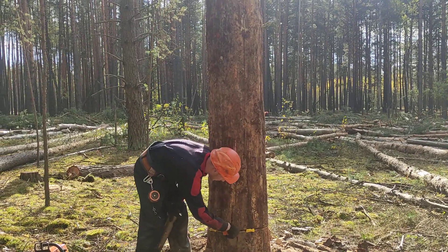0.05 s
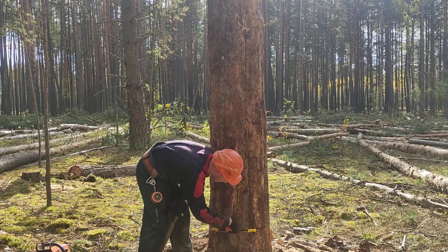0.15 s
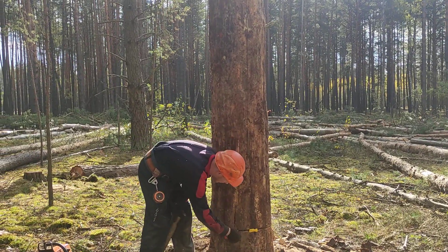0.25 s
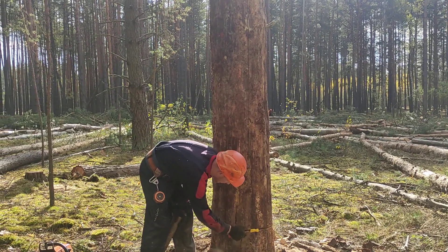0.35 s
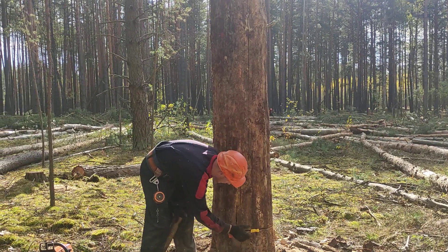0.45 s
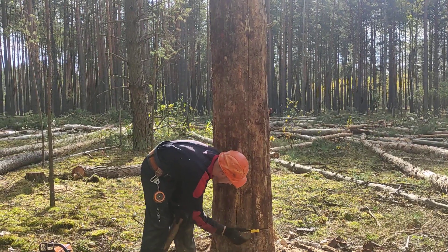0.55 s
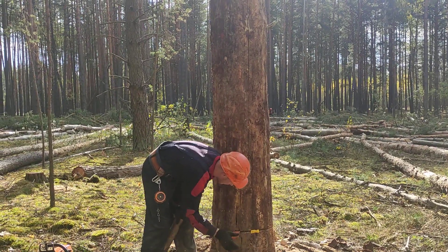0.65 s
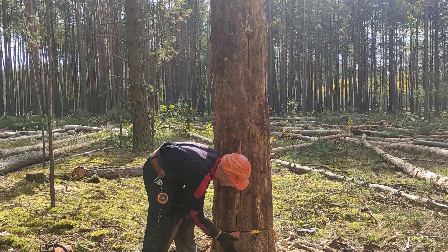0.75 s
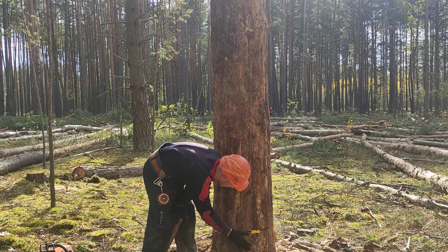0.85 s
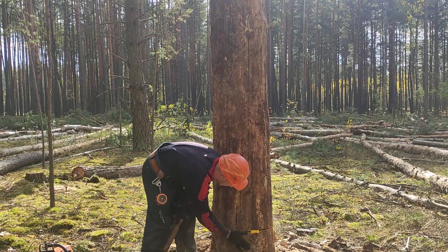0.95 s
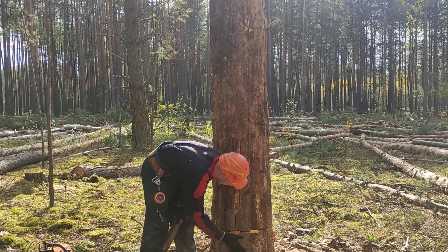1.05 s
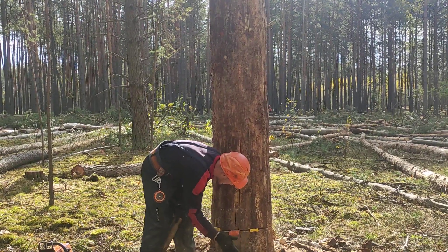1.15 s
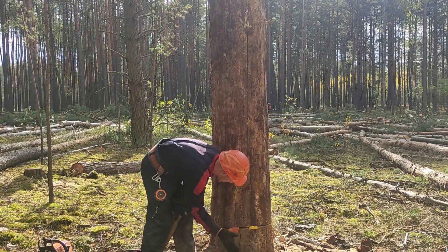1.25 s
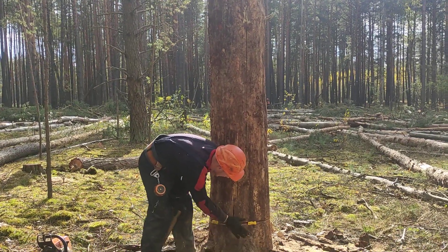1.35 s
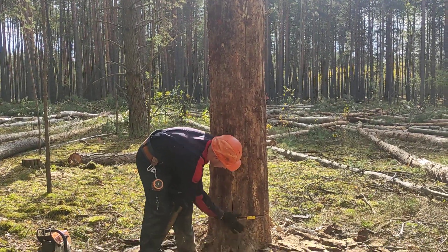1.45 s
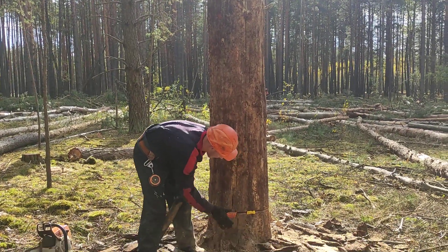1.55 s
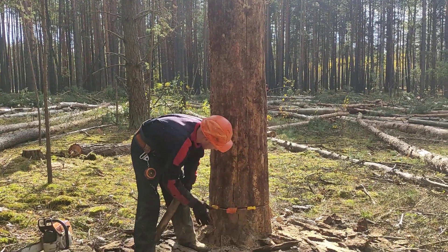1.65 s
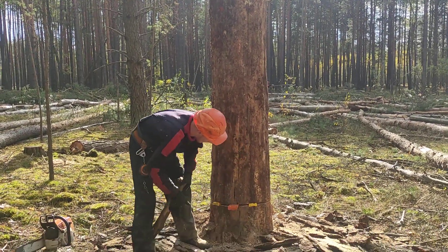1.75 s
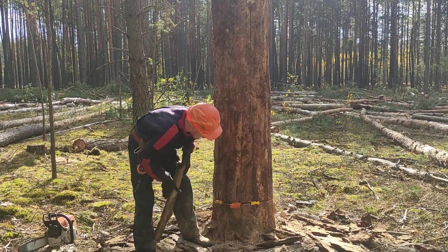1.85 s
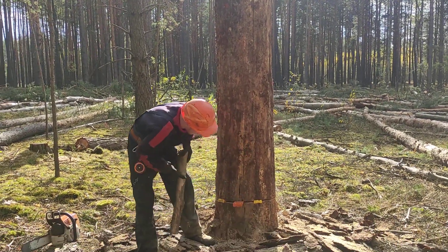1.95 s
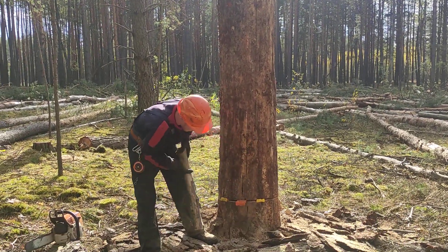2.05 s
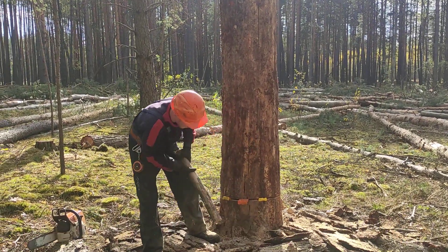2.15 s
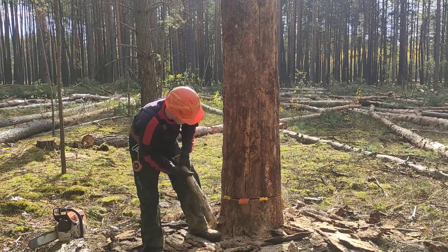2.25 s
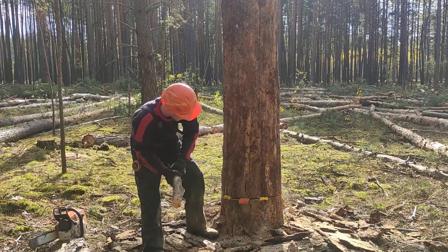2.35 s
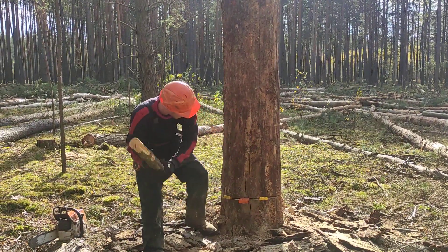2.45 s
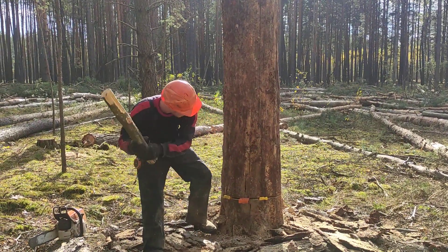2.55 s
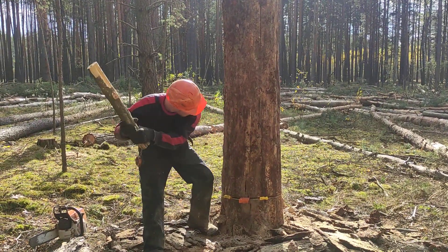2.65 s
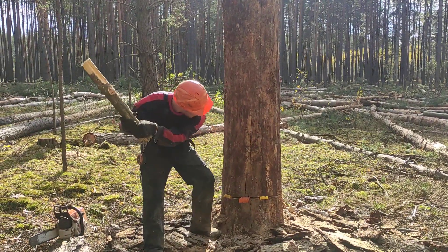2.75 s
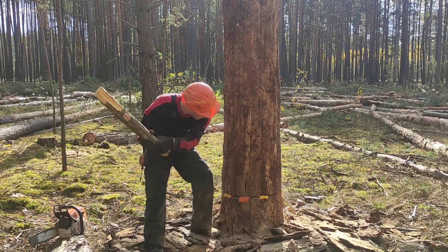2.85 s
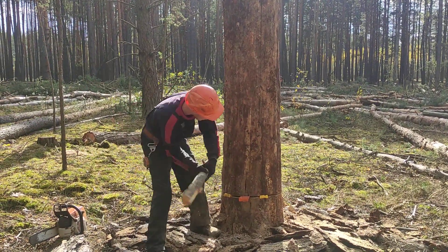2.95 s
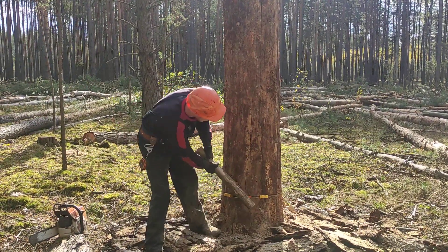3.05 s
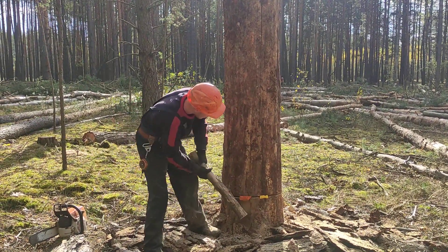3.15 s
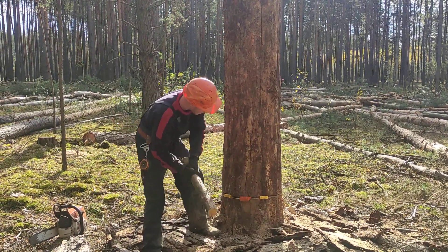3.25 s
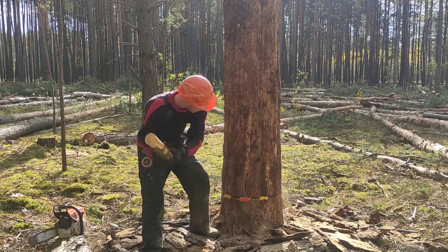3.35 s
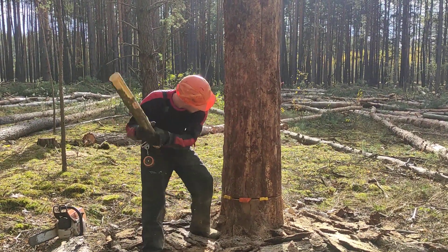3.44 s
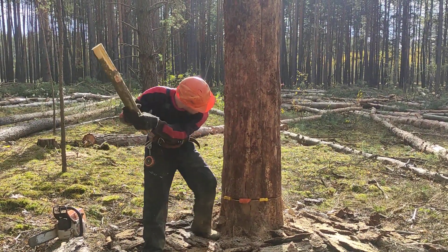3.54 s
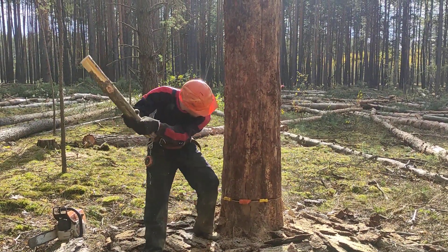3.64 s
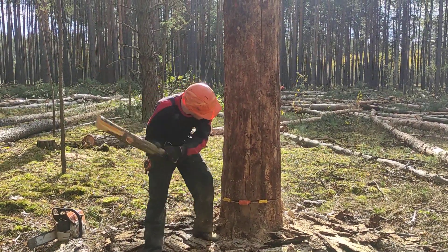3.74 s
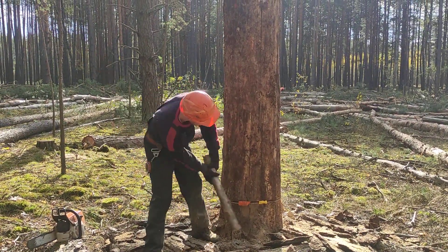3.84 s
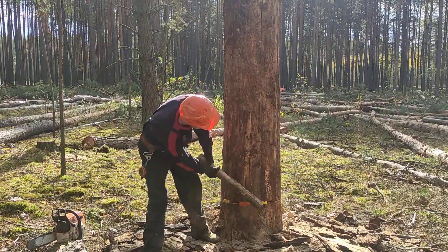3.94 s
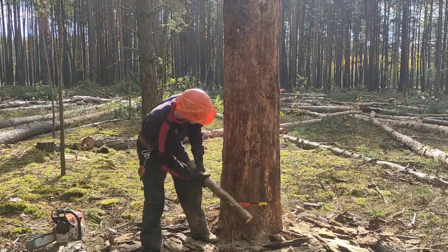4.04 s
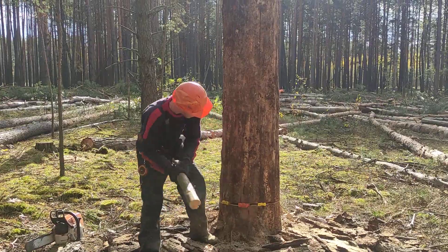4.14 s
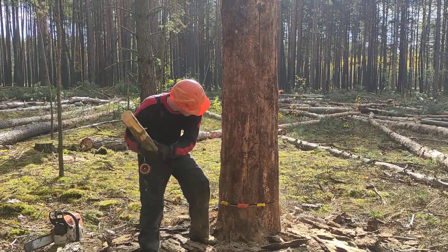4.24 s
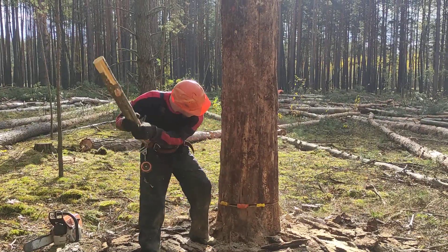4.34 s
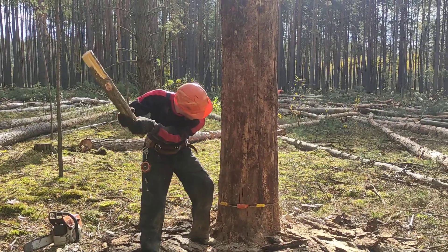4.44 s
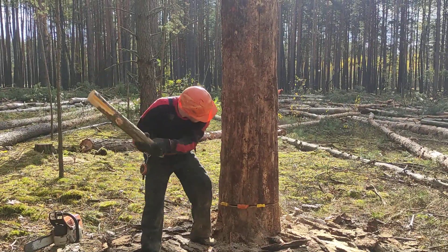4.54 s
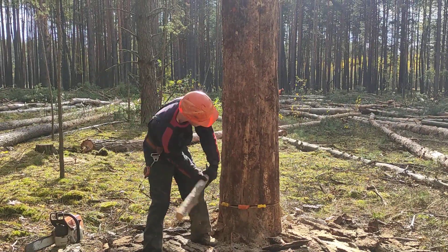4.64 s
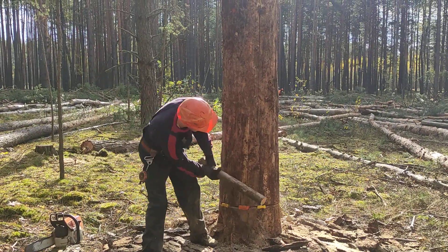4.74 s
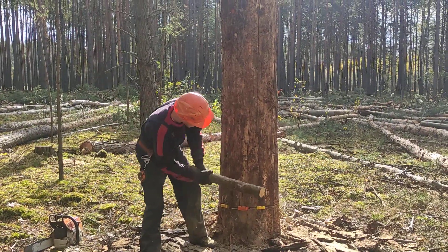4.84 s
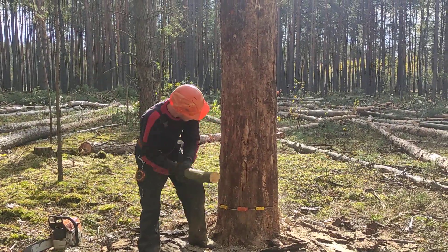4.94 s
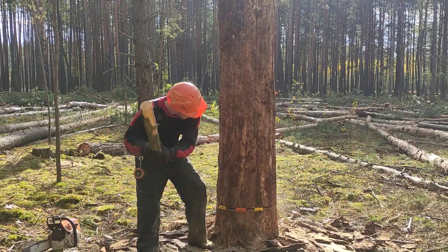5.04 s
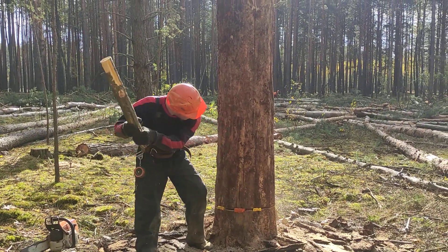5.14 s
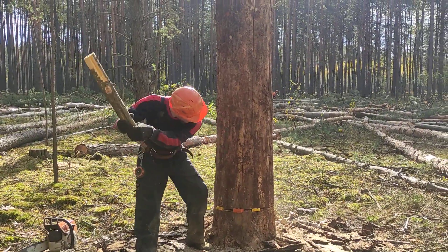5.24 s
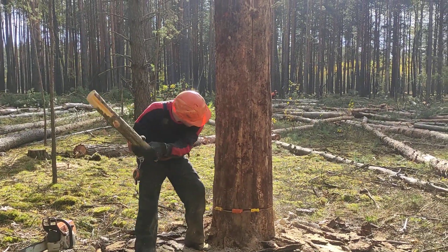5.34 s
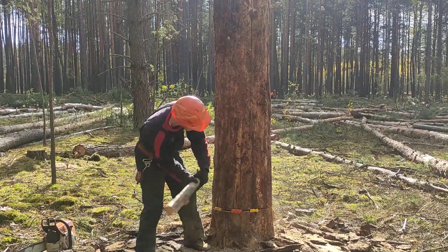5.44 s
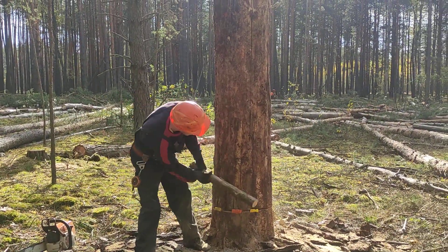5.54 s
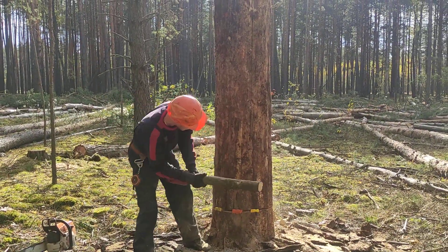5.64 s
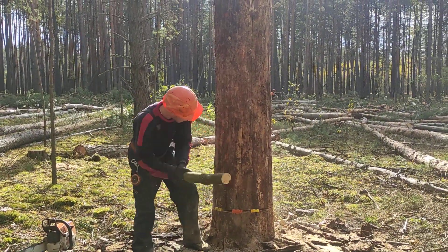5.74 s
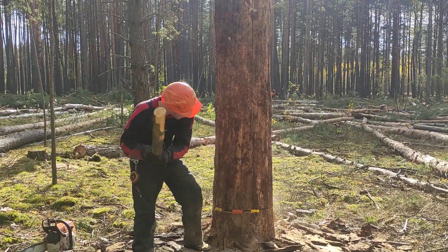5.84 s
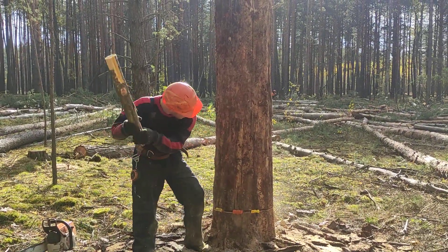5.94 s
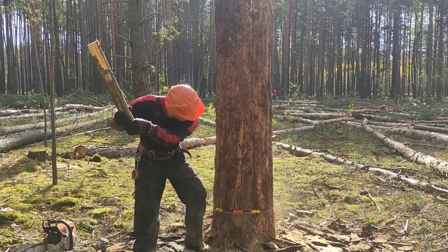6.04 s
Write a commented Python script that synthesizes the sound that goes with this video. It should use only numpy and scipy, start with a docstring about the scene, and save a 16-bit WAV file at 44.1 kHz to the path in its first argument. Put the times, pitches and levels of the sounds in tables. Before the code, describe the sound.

A still forest clearing with a very faint hush of wind in the crowns and slight low buffeting. In the first half second, soft boot bumps on moss, small twig ticks and a brief cloth brush. At 0.93 s a tight cluster of light wooden taps, then a firmer knock at 1.43 s. From 1.5 to 3 s feet shift: dull bumps, crackling dry litter, snapping bark and twigs, heavy cloth swishing. Four hard club blows on a wedge land at about 3.14, 3.99, 4.82 and 5.62 s, the first with a small rebound knock. Each is a very short, dry, woody crack with crushed fibres, a low boom sinking in the trunk, stronger on the last two, and a diffuse echo from the tree line swelling about 0.3 s later. Sparse rustles and ticks fall between; cloth brushes near 5.95 s, with a last boot bump at 6 s as the echo lingers.

```python
"""Driving a felling wedge

A forester seats a felling wedge in a pine with light knocks, steps back and drives it with four swings of a
wooden club. Each blow is a crack of damped wood modes and fibre noise, with a sinking boom of many sines in the
trunk and an echo of sparse filtered impulses from the trunks nearby and, later, from the forest edge across the
clearing. Between blows, boots bump on moss as sinking sines; filtered noise and grains make dry litter, bark,
twigs, brushing clothes and a faint wind in the crowns."""
import sys
import numpy as np
from scipy import signal
from scipy.fft import rfft, irfft, next_fast_len
from scipy.io import wavfile

SR = 44100
rng = np.random.default_rng(int(sys.argv[2]) if len(sys.argv) > 2 else 0)


def to_wav(sig):
    """Store sig (one row per channel, or 1-D mono) as 16-bit WAV at the path in sys.argv[1].

    Samples outside -1..1 are clipped; the rate is SR.
    """
    pcm = np.clip(np.atleast_2d(sig), -1, 1) * 32767
    pcm = np.round(pcm).astype(np.int16)
    wavfile.write(sys.argv[1], SR, pcm.T)  # frames by channels


N = 268569


def amp(db):
    """Decibels to gain."""
    return 10 ** (np.asarray(db) / 20)


def unit(x):
    """Scales to rms 1."""
    return x / np.sqrt(np.mean(x ** 2) + 1e-20)


def burst_energy(x):
    """Scales a short sound to the energy of 10 ms at rms 1."""
    return x * np.sqrt(SR / 100 / np.sum(x ** 2))


def seconds(length):
    """A time axis of the given length in seconds."""
    return np.arange(int(length * SR)) / SR


def decay(t, t60):
    """Exponential decay that falls 60 dB in t60 seconds."""
    return np.exp(-np.log(1000) * t / t60)


def add(mix, s, sound):
    """Mixes a sound in at time s, cut off at the end of the mix."""
    part = mix[max(round(s * SR), 0):][:len(sound)]
    part += sound[:len(part)]


def colour(x, points):
    """Causal minimum-phase filter with the given (frequency [Hz], level [dB]) outline."""
    size = 2 * next_fast_len(len(x))
    hz, db = np.transpose(points)
    bins_hz = np.fft.rfftfreq(size, 1 / SR)
    outline_db = np.interp(np.log(bins_hz + 1), np.log(hz), db)
    # folding the cepstrum onto positive time gives the phase that belongs to the outline
    cepstrum = irfft(np.log(amp(outline_db)))
    cepstrum[1:size // 2] *= 2
    cepstrum[size // 2 + 1:] = 0
    response = np.exp(rfft(cepstrum))
    return irfft(rfft(x, size) * response)[:len(x)]


def drift(size, rate):
    """Slow chance of rms 1, moving up to about rate times a second."""
    lowpass = 1 / (1 + (np.fft.rfftfreq(size, 1 / SR) / rate) ** 4)
    return unit(irfft(rfft(rng.standard_normal(size)) * lowpass, size))


def burst(t, t60, points, rise):
    """A swelling, then dying shower of fibre breaks: coloured noise of fixed energy."""
    breaks = rng.choice([-1, 1], len(t))
    swell = 1 - np.exp(-t / rise)
    return burst_energy(colour(breaks * swell * decay(t, t60), points))


# spectrum of the wind in the crowns: (frequency [Hz], level [dB])
WIND_COLOUR = [(15, -42), (25, -30), (64, 4), (135, -17.5), (185, -8), (339, -4), (373, -8.5), (635, -8),
               (733, -9), (1110, -16.5), (1340, -23), (2120, -24), (4480, -45), (6600, -31), (8000, -43.5),
               (10400, -78.5), (17600, -120)]


def wind(level_db=-57, swell_db=-1.0, buffet_db=-67, gust_db=3):
    """A steady hush in the crowns, and uneven low buffeting at the microphone."""
    hush = unit(colour(rng.standard_normal(N), WIND_COLOUR))
    hush *= amp(level_db + swell_db * drift(N, 1.0))
    buffet_colour = [(20, -12.0), (70, -3.5), (130, 8.0), (300, -18.0), (1000, -75.5)]
    buffet = unit(colour(rng.standard_normal(N), buffet_colour))
    return hush + buffet * amp(buffet_db + gust_db * drift(N, 3.5))


# feet stirring the dry litter: (time at full level [s], hold [s], level [dB])
SHUFFLES = [(0.0, 0.1, -70), (1.416, 0.2, -62.5), (1.766, 0.15, -59.5), (2.43, 0.29, -70.5),
            (2.714, 0.31, -65), (3.107, 0.21, -66.5), (3.96, 0.23, -66.5), (4.71, 0.14, -71)]
SHUFFLE_ATTACK_S, SHUFFLE_RELEASE_S = 0.075, 0.086
# the litter is almost still while he crouches, and never quite at rest once he is up
STANDS_UP_S, CROUCHED_DB, STANDING_DB = 1.7, -90.5, -74.5


def stirring():
    """How hard the feet work the litter: each shuffle starts quickly, holds and dies away."""
    t = np.arange(N) / SR
    power = amp(np.where(t < STANDS_UP_S, CROUCHED_DB, STANDING_DB)) ** 2
    for s, hold, db in SHUFFLES:
        attack = np.clip(1 + (t - s) / SHUFFLE_ATTACK_S, 0, 1)
        release = np.exp(-np.maximum(t - s - hold, 0) / SHUFFLE_RELEASE_S)
        power += (amp(db) * attack * release) ** 2
    return np.sqrt(power)


# spectrum of the dry litter: (frequency [Hz], level [dB])
LITTER_COLOUR = [(100, -47), (400, 6.5), (800, -12.5), (1300, -0.5), (2200, -6.5), (3400, -8), (4100, -25),
                 (5400, -14.5), (6200, -3.5), (7400, -3.5), (9000, -62)]


def rustle(grains_per_s=700, clump_db=3, clump_rate=30):
    """Dry litter crackles in clumps of tiny grains, a few of them much larger, as the feet shift."""
    sizes = amp(4.6 * np.minimum(rng.exponential(1, N), 3))
    sizes *= rng.random(N) < grains_per_s / SR
    grains = unit(colour(sizes * rng.choice([-1, 1], N), LITTER_COLOUR))
    return grains * stirring() * amp(clump_db * drift(N, clump_rate))


# spectrum of snapping bark and twigs, for chips and twigs alike: (frequency [Hz], level [dB])
SNAP_COLOUR = [(150, -27), (600, 4.5), (1200, -3.5), (2200, -1), (3300, -17.5), (4300, -17), (5400, -10.5),
               (6500, 1), (7500, -5.5), (9000, -18)]


def chips(level_db=9, spread_db=2, per_s=4, t60=0.014, rise=0.00025, busy_db=-68):
    """Now and then a small chip of bark ticks by itself, louder as the feet get busier, up to a limit."""
    breaks = (rng.random(N) < per_s / SR) * amp(spread_db * rng.standard_normal(N))
    breaks = breaks * np.minimum(stirring(), amp(busy_db))
    tick = burst(seconds(.06), t60, SNAP_COLOUR, rise)  # one fibre shower serves all chips
    return signal.oaconvolve(breaks, tick)[:N] * amp(level_db)


# boots landing on moss and rocking until they settle:
# (time [s], level [dB], middle of the pitch glide [Hz], gap between bumps [s], loss per bump, sign ignored [dB])
STEPS = [(0.081, -41.5, 87, 0.05, -2), (0.353, -37.5, 83, 0.052, 2), (0.396, -28, 182, .058, 17),
         (0.411, -29.5, 124, 0.061, 20), (0.453, -30, 119, .055, 6.5), (1.195, -38, 84, .055, 20),
         (1.506, -35.5, 110, 0.11, 5), (1.573, -29, 95, .077, 8), (2.544, -41.5, 82, .055, 15),
         (2.781, -41, 233, .055, 32), (3.077, -31, 87, 0.043, 15), (3.367, -41.5, 82, 0.049, 1.2),
         (4.196, -39.5, 125, .055, 23), (5.178, -32.5, 98, 0.039, 9), (6.031, -35, 72.5, 0.048, 15)]


def bumps(swell=0.0056, sag=0.48, uneven=0.14, count=4):
    """Soft ground takes a push and swings back, slowing as it settles; the boot rocks and pushes ever more weakly."""
    out, t = np.zeros(N), seconds(.1)
    # after the landing, each rock of the boot meets firmer or softer ground
    after_landing = np.arange(count) > 0
    stiffness = 1 + uneven * rng.uniform(-1, 1, (len(STEPS), count)) * after_landing
    glide = 1 + sag * (2 * np.exp(-t / (2 * swell)) - 1)
    pulse = t / swell * np.exp(1 - t / swell)
    for (s, db, hz, gap, lost_db), ground in zip(STEPS, stiffness):
        turns = np.cumsum(hz * glide) / SR
        for k in range(count):
            push = pulse * np.sin(2 * np.pi * turns * ground[k])
            add(out, s + k * gap, amp(db - k * abs(lost_db)) * push)
    return out


# twigs and bark chips breaking: (time [s], level before the common trim [dB], woody body [dB])
TWIGS = [(0.169, -53, 7), (0.209, -46.5, 2), (0.311, -54.5, 8), (1.146, -54, -1), (1.388, -50.5, -9),
         (1.553, -38, 7), (1.879, -43, 1), (2.012, -44, 7.5), (2.302, -41, 9.5), (2.396, -36.5, -1),
         (2.460, -46.5, -4), (2.702, -57, -12), (2.818, -47, -8), (2.964, -50.5, 16), (2.982, -48, 9),
         (3.075, -50, 1), (3.357, -43, 9), (3.616, -45, -12), (4.465, -48.5, -7), (5.119, -46, 15.5),
         (5.238, -56.5, -12)]


def twigs(thin_t60=0.014, rise=0.00063, trim_db=-5):
    """Thin twigs only tick; thick ones and bark have a woody body and crunch for longer."""
    out, t = np.zeros(N), seconds(.06)
    for s, db, body_db in TWIGS:
        # the body counts in full up to 1200 Hz and not at all from 6000 Hz
        outline = [(hz, level + body_db * np.interp(hz, [1200, 6000], [1, 0])) for hz, level in SNAP_COLOUR]
        crunch = amp(.3 * body_db)
        add(out, s, amp(db + trim_db) * burst(t, thin_t60 * crunch, outline, rise))
    return out


# sleeves and trouser legs brushing: (middle [s], length [s], level before the fade in and out [dB])
SWISHES = [(0.218, 0.043, -49), (1.855, 0.32, -55.5), (2.125, 0.38, -59.5), (2.336, 0.14, -55.5),
           (2.62, 0.39, -55), (2.846, 0.23, -54), (5.954, 0.29, -53.5)]
# spectrum of the cloth: (frequency [Hz], level [dB])
CLOTH_COLOUR = [(100, -5.5), (300, 3.5), (550, -1), (850, -1.5), (1300, -12.5), (2200, -11), (4000, -33),
                (8000, -28.5)]


def clothes(grain_db=2, grain_rate=70):
    """Heavy cloth rubs in short, uneven strokes."""
    out = np.zeros(N)
    for s, length, db in SWISHES:
        size = len(seconds(length))
        rub = unit(colour(rng.standard_normal(size), CLOTH_COLOUR))
        rub *= amp(db + grain_db * drift(size, grain_rate))
        add(out, s - length / 2, rub * np.hanning(size))
    return out


# club, wedge and stem ringing together, before each blow's pitch and tilt:
# (frequency [Hz], level [dB], t60 [s])
WOOD_MODES = [(97, -9.5, 0.008), (329, -16, 0.027), (590, -16.5, 0.0099), (710, 2, 0.004),
              (671, -5.5, 0.025), (776, 6, 0.012), (973, 4, 0.016), (1425, -4, 0.01), (1572, -2, 0.012),
              (1930, -12.5, 0.022), (2200, -10, 0.012), (3040, -11, 0.005)]
# spectrum of the crushed fibres: (frequency [Hz], level [dB])
SPLINTER_COLOUR = [(300, -55.5), (900, 9.5), (2300, -2), (3400, -4.5), (4500, -15.5), (5500, -4),
                   (6300, -6.5), (7300, -7), (9000, -7)]


def knock(force_db, pitch, again_ms, again, thud_db, trunk_db, clack_db, bright_db, splinter_db,
          fibre_db=-26, fibre_t60=0.018, fibre_rise=0.0069, contact=0.001):
    """The club rings the wood's modes, crushes fibres, and catches the wedge once more as it gives."""
    t = seconds(.12)
    # where the club lands decides how strongly each group of modes is driven
    group_hz = [100, 300, 550, 700, 950, 1300, 1700, 2100]
    group_db = [thud_db, trunk_db, 0, 0, clack_db, bright_db, bright_db, splinter_db]
    ring = np.zeros(len(t))
    for hz, db, t60 in WOOD_MODES:
        drive = amp(db + np.interp(hz, group_hz, group_db))
        ring += drive * decay(t, t60) * np.sin(2 * np.pi * hz * pitch * t)
    ring *= 1 - np.exp(-t / contact)
    ring += again * np.interp(t - again_ms / 1000, t, ring, left=0)
    fibres = amp(fibre_db + splinter_db / 2) * burst(t, fibre_t60, SPLINTER_COLOUR, fibre_rise)
    return amp(force_db) * (ring + fibres)


# spectrum of the scatter close by: (frequency [Hz], level [dB])
NEAR_COLOUR = [(60, -6.5), (250, 13.5), (600, -0.5), (1100, 1), (2000, 1), (4000, 2), (8000, 2)]


def nearby(x, level_db=-22.0, t60=0.091, gap=0.0073):
    """Stumps, logs and ground close by scatter a short tail."""
    t = seconds(.3)
    opening = np.clip(t / gap - 1, 0, 1)  # silent for one gap, full after two
    taps = rng.standard_normal(len(t)) * decay(t, t60) * opening
    tail = colour(taps / np.linalg.norm(taps), NEAR_COLOUR)
    return amp(level_db) * signal.fftconvolve(x, tail)[:len(x)]


def boom(start_hz=300, sink=.3, rise=0.0093, spread=0.016, t60=2.3, wander=.48, top_hz=340):
    """Bending waves run up the stem and back; low ones travel slower, so the rumble sinks and thins out."""
    t = seconds(.7)
    hz = start_hz / (1 + t / sink)
    paths = rng.uniform(size=(40, 2))  # many paths through the stem, each with its own speed and phase
    speed = np.exp(wander * np.linspace(-1, 1, len(paths)) + .03 * paths[:, 0])
    turns = speed[:, None] * np.cumsum(hz) / SR + paths[:, 1:]
    waves = np.sin(2 * np.pi * turns).sum(0)
    level = (1 - np.exp(-(t / rise) ** 2)) / np.hypot(1, t / spread) * decay(t, t60)
    # the wood soaks up the waves above top_hz
    soak = signal.butter(8, top_hz, fs=SR, output="sos")
    return burst_energy(signal.sosfilt(soak, waves * level))


# spectrum of the forest's answer, before each blow's pitch and tint: (frequency [Hz], level [dB])
FAR_COLOUR = [(40, -4), (140, -2.5), (220, -12.5), (330, -3.5), (450, -4), (620, -3), (880, 1.5),
              (1250, -8.5), (1750, -3.5), (2200, -16.5), (3300, -26.5), (4200, -35.5), (7500, -44)]
# scattered trunks answer at once and fade; the wall of trees round the clearing answers later
SCATTER_RISE_S, SCATTER_FADE_DB_PER_S = .02, 9.5
TREELINE_DELAY_S, TREELINE_SPREAD_S, TREELINE_DB = 0.29, 0.087, -0.5
AVERAGE_CLACK_DB = -5  # a blow with this much clack leaves the middle of the forest's colour plain


def forest(pitch, clack_db, splinter_db, clack_share=0.49, treble_share=0.96, clump_db=0.37, clump_rate=25):
    """Thousands of trunks throw a blow back in its own colour: those close by at once, the edge of the clearing
    later."""
    t = seconds(1.5)
    trunks = rng.standard_normal(len(t)) * (rng.random(len(t)) < 6000 / SR)  # 6000 trunks a second
    middle_db = clack_share * (clack_db - AVERAGE_CLACK_DB)
    tint = [650, 900, 1750, 2200], [0, middle_db, middle_db, treble_share * splinter_db]
    outline = [(hz * pitch, db + np.interp(hz, *tint)) for hz, db in FAR_COLOUR]
    scatter = (1 - np.exp(-t / SCATTER_RISE_S)) * amp(-SCATTER_FADE_DB_PER_S * t)
    treeline = amp(TREELINE_DB) * np.exp(-((t - TREELINE_DELAY_S) / TREELINE_SPREAD_S) ** 2 / 2)
    clumps = amp(clump_db * drift(len(t), clump_rate))
    return unit(colour(trunks, outline)) * np.hypot(scatter, treeline) * clumps


# blows on the wedge: (time [s], force [dB], pitch [factor], share of second contact [0-1],
# grip of the wedge [dB], trunk [dB], clack [dB], splinter [dB], boom [dB])
BLOWS = [(0.9282, -23.5, 0.76, 0.27, -12, -20, -14, 11, -60),
         (0.9343, -21.5, 0.91, 0.04, -15, 1, -13, 18, -43),
         (0.9388, -17, 1.02, 0.54, -4.5, 7, -7.5, 5, -52),
         (1.431, -10.5, 0.95, 0.38, -3.5, 16.5, -2, 12, -37.5),
         (3.1381, 2.5, 0.92, 0.41, -5, -4, -11, 4.5, -31), (3.193, -24.5, 1.08, 0.37, 2, 13, -11, 11, -48),
         (3.9912, -0.5, 1.002, 0, 4.5, 1.5, -4, 4, -36), (4.8184, 2, 1.004, 0.01, 3, 9.5, -11, -5.5, -24),
         (5.624, 3.5, 0.91, 0.09, 4, 5.5, -13.5, -4.5, -22.5)]
SECOND_CONTACT_MS = 3.165
# a wedge that grips rings brighter and passes more of the blow into the stem:
# level at grip 0 [dB], and dB per dB of grip
THUD_DB, THUD_PER_GRIP = 7.5, 1.44
ECHO_DB, ECHO_PER_GRIP = -52.5, 0.96


def wedge():
    """All blows: the direct knocks, and what lingers in the stem and the forest."""
    direct, lingering = np.zeros(N), np.zeros(N)
    for s, force_db, pitch, again, grip_db, trunk_db, clack_db, splinter_db, boom_db in BLOWS:
        thud_db = THUD_DB + THUD_PER_GRIP * grip_db
        echo_db = force_db + ECHO_DB + ECHO_PER_GRIP * grip_db
        hit = knock(force_db, pitch, SECOND_CONTACT_MS, again, thud_db, trunk_db, clack_db,
                    bright_db=grip_db, splinter_db=splinter_db)
        add(direct, s, hit)
        add(lingering, s, amp(boom_db) * boom())
        add(lingering, s, amp(echo_db) * forest(pitch, clack_db, splinter_db))
    return direct, lingering


def scene(radiation_hz=62):
    """Blows and footwork in the clearing; the stem is too narrow to radiate deep bass."""
    knocks, lingering = wedge()
    radiated = signal.lfilter(*signal.butter(2, radiation_hz, "high", fs=SR), knocks)
    sharp = radiated + twigs() + chips()
    blows = sharp + nearby(sharp) + lingering
    return (blows + bumps() + clothes() + rustle() + wind())[None]


def record(dry, ceiling=0.97, bass_hz=20, edge_hz=7750):
    """The hardest blows are rounded off by overload; then the bass roll-off and the band limit."""
    rounded = ceiling * np.tanh(dry / ceiling)
    thinned = signal.lfilter(*signal.butter(1, bass_hz, "high", fs=SR), rounded)
    band_limit = signal.firwin(151, edge_hz, window=("kaiser", 6), fs=SR)
    return signal.oaconvolve(thinned, band_limit[None], "same")


dry = scene()
out = record(dry)
to_wav(out)
```